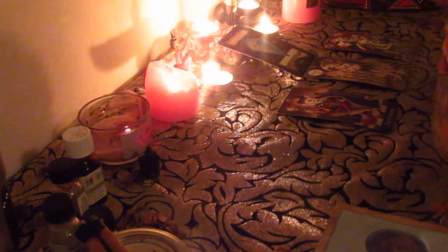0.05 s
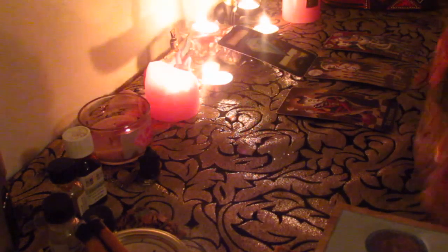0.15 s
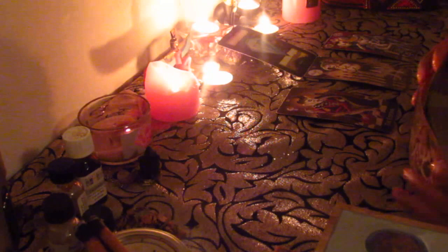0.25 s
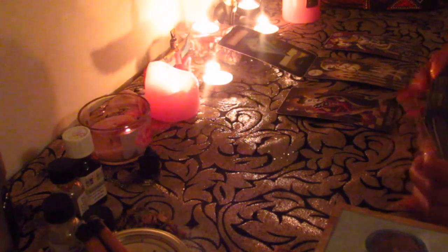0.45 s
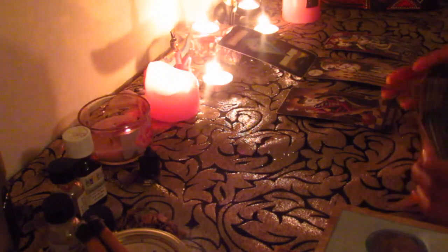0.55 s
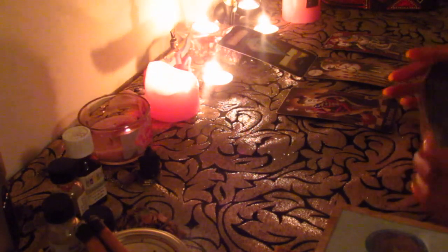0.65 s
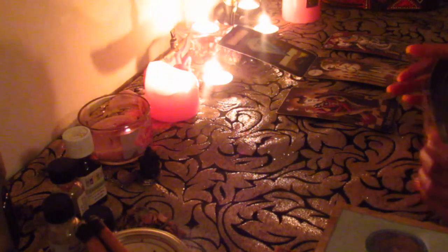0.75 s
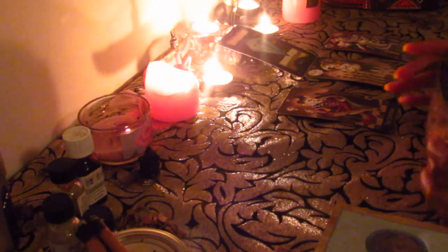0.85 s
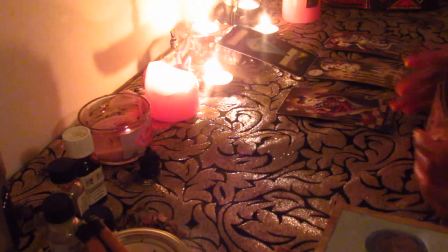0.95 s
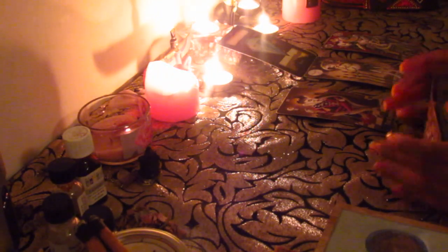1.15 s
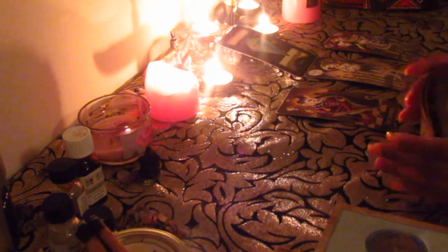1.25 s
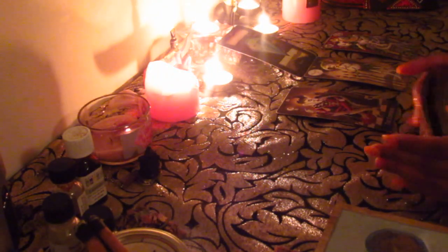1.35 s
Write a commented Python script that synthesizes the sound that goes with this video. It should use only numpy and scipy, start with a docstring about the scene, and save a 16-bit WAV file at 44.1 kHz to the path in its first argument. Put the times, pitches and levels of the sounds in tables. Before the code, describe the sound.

A deck of cards is knocked once on a cloth-covered wooden table with a dull, clacking thump. Faint card sliding, hand rubbing and a few soft pats follow, heard slightly left in a small, quiet room.

```python
"""A small, quiet room: a faint tone fades over the low room tone while cards slide through the hands.
At 0.2 s the deck is knocked once on a cloth-covered wooden table. Hand and deck land in a quick cluster
of contacts: the top thuds, the cards clack, the deck's edge cracks, table and room ring on.
Then cards slide and a hand rubs the deck; from 0.6 s come a few soft pats and ticks of card edges.
Near 1.4 s a small hard thing is touched and clinks faintly."""
import sys
import numpy as np
from scipy import signal
from scipy.fft import rfft, irfft
from scipy.io import wavfile
from scipy.ndimage import uniform_filter1d

SR = 44100
rng = np.random.default_rng(int(sys.argv[2]) if len(sys.argv) > 2 else 0)


def master(y):
    """Save y as 16-bit WAV."""
    cut = np.clip(np.atleast_2d(y).T, -1, 1)
    pcm = np.round(cut * 32767)  # scale
    wavfile.write(sys.argv[1], SR, pcm.astype(np.int16))


N = 61739
TIME = np.arange(N) / SR
HZ = np.maximum(np.arange(N // 2 + 1) * SR / N, 1)
CLACK_ATTACK_S = 0.00091


def knock():
    """Hand and deck land in a cluster of contacts; the hand's weight rocks the whole table."""
    # (time [s], thud [dB], clack [dB], clack cutoff [Hz])
    contacts = [(0.190, -31, -34.5, 1760), (0.2, -23, -26, 1440), (0.2085, -32, -15, 2200),
                (0.2187, -4.5, -20.5, 1790), (0.228, -28, -12.5, 4450), (0.2325, -18.5, -11, 3050),
                (0.2385, -11, -15.5, 2520), (0.2465, -20, -18.5, 2150)]
    # table top: (frequency [Hz], level [dB], t60 [s])
    top_modes = [(251.5, -16, 0.11), (300.5, -1, 0.028), (351, -13.5, 0.081), (489.4, -10, 0.078),
                 (546.7, -23, 0.18)]
    # whole table: (frequency [Hz], level [dB], t60 [s])
    rocking_modes = [(126.8, -26.5, 0.14), (170.4, -31.5, 0.2)]
    hits = sum(contact(top_modes, *row) for row in contacts)
    rocking = high_pass(struck(rocking_modes, start_s=0.23), hz=73)
    return hits + edge_crack() + rocking


def contact(modes, start_s, thud_db, clack_db, cutoff_hz):
    """One contact: the body thuds in its modes, the cards clack as a noise burst."""
    # clack spectrum: (frequency [Hz], density [dB])
    colour = [(100, 4), (300, 3), (520, 7), (670, 3), (800, 8.5), (1300, 1.5), (2400, 2.5), (3100, -2),
              (4200, -7), (5200, -17.5), (15000, -7)]
    t = np.maximum(TIME - start_s, 0)
    clack = evened(noise(colour)) * grainy(depth_db=2.5, rate_hz=304)  # loose cards rattle
    clack = clack * rising(t, CLACK_ATTACK_S) * dying(t, t60_s=0.081)
    clack = from_db(clack_db) * low_pass(clack, cutoff_hz, order=4)
    thud = struck(modes, start_s) * rising(t, tau_s=0.00094)
    thud = from_db(thud_db) * low_pass(thud, hz=765)  # softened by the cloth
    return high_pass(clack - thud, hz=187, order=3)  # the contacts carry little deep bass


def edge_crack(start_s=0.2298):
    """The deck's edge meets the table with a short crack."""
    # crack spectrum: (frequency [Hz], density [dB])
    colour = [(800, -23), (2000, -9), (3200, 4), (4200, -0.5), (5200, -24), (15000, -39)]
    t = np.maximum(TIME - start_s, 0)
    return from_db(-17) * evened(noise(colour)) * rising(t, CLACK_ATTACK_S) * dying(t, t60_s=0.015)


def table_rings():
    """The hardest contact sets the table and the things on it ringing thinly."""
    # lasting rings: (frequency [Hz], level [dB], t60 [s])
    modes = [(231.2, -31.5, .55), (546.6, -39.5, 0.62), (799, -37, 0.34), (906, -30, 0.22),
             (1033, -24, 0.19), (1190, -28.5, 0.26), (1490, -38.5, .35), (1658, -28, 0.15),
             (1843, -27.5, 0.23), (1881, -32.5, 0.41), (1955, -33, 0.24), (2406, -24, 0.12),
             (3426, -33, 0.1), (4110, -34.5, 0.11)]
    return low_pass(struck(modes, start_s=0.231), hz=4420, order=4)


def pats():
    """Soft pats on the cards: weak, dull contacts."""
    # (time [s], thud [dB], clack [dB], clack cutoff [Hz])
    contacts = [(0.614, -45, -29, 1130), (0.6215, -26.5, -40, 650), (0.9312, -31, -42.5, 2000),
                (1.288, -34, -51, 1100)]
    # ring of a pat: (frequency [Hz], level [dB], t60 [s])
    modes = [(139.5, -1.5, 0.19), (312.1, -8, 0.23), (339, -1.5, 0.061), (480, -4.5, 0.045)]
    return sum(contact(modes, *row) for row in contacts)


def card_slides():
    """Sliding cards: bright friction."""
    # (peak time [s], level [dB], rise [s], fall [s])
    strokes = [(0.049, -46.5, 0.04, 0.028), (0.225, -50.5, 0.022, 0.046), (0.405, -49, 0.056, 0.027),
               (0.466, -41, 0.032, 0.014), (0.618, -52.5, 0.036, 0.068), (0.73, -56, 0.017, 0.021),
               (0.902, -53.5, 0.023, 0.027), (1.005, -51, 0.04, 0.057), (1.07, -53, 0.061, 0.033),
               (1.301, -49, 0.024, 0.023), (1.39, -59.5, 0.0059, .03)]
    # slide spectrum: (frequency [Hz], density [dB])
    colour = [(150, -12), (400, 1), (670, 3), (1100, 4), (2500, -0.5), (4500, -3), (8000, -2.5),
              (12000, -4), (15000, -12)]
    return friction(strokes, colour)


def hand_rubs():
    """A hand rubs over the deck: duller friction."""
    # (peak time [s], level [dB], rise [s], fall [s])
    strokes = [(0.055, -61.5, 0.063, 0.045), (0.468, -39, 0.048, 0.029), (0.905, -51.5, 0.0079, 0.013),
               (1.388, -51.5, .006, 0.0075)]
    # rub spectrum: (frequency [Hz], density [dB])
    colour = [(100, -3), (400, -2), (670, -12), (1100, 4), (1800, -3.5), (2900, -2), (4500, -17.5),
              (15000, -52)]
    return friction(strokes, colour)


def friction(strokes, colour):
    """Grainy hiss that swells and dies with each stroke."""
    power = np.zeros(N)
    for peak_s, db, rise_s, fall_s in strokes:
        width_s = np.where(TIME < peak_s, rise_s, fall_s)
        power += from_db(db) ** 2 * np.exp(-2 * ((TIME - peak_s) / width_s) ** 2)
    return noise(colour) * np.sqrt(power) * grainy(depth_db=2, rate_hz=1230)


def edge_flicks():
    """Card edges slip free: each a tiny bright snap with a short tail."""
    # (time [s], level [dB])
    ticks = [(0.616, -50.5), (0.8363, -44.5), (0.906, -56.5), (1.295, -49)]
    # tick spectrum: (frequency [Hz], density [dB])
    colour = [(500, 0.5), (2500, -7), (4300, -7), (5400, -6.5), (7500, -1.5), (10000, -16), (15000, -8.5)]
    envelope = np.zeros(N)
    for start_s, db in ticks:
        t = TIME - start_s
        snap = from_db(5) * dying(t, t60_s=0.0048)
        envelope += from_db(db) * (t > 0) * (snap + dying(t, t60_s=0.069))
    return noise(colour) * envelope


def clink():
    """A small hard thing is touched and rings faintly."""
    # (frequency [Hz], level [dB], t60 [s])
    modes = [(2660, -56, .07), (3020, -52, .09)]
    return struck(modes, start_s=1.3835)


def room(direct, delay_s=0.0029):
    """Diffuse reflections build up quickly and die band by band."""
    # reverb spectrum: (frequency [Hz], level [dB])
    colour = [(100, -8.5), (220, 2), (400, -8.5), (580, -1), (800, -7), (1100, 2), (1800, 3.5),
              (2800, -2.5), (4500, -2), (15000, 4)]
    # reverb time: (frequency [Hz], t60 [s])
    decay = [(100, 0.34), (500, 0.56), (1500, 0.72), (3000, 0.66), (6000, 0.57), (15000, 0.26)]
    # (frequency [Hz], left-right correlation [1])
    correlation = [(100, 0.91), (400, 0.89), (1000, 0.83), (2000, 0.95), (4000, .95), (8000, 0.76),
                   (14000, 0.22)]
    white = noise([(20, 0), (20000, 0)], correlation)
    spectrum = rfft(white) * from_db(at_hz(colour, HZ))
    t = np.maximum(TIME - delay_s, 0)
    edges_hz = np.geomspace(40, 20000, 10)
    tail = np.zeros((2, N))
    for lo, hi in zip(edges_hz, edges_hz[1:]):
        band = irfft(spectrum * (HZ >= lo) * (HZ < hi), N)
        tail += band * dying(t, at_hz(decay, np.sqrt(lo * hi)))
    nominal_energy = np.sum(dying(TIME, t60_s=0.56) ** 2)
    tail *= rising(t, tau_s=0.0027) / np.sqrt(nominal_energy)
    mono = direct.mean(axis=0)[None]
    return from_db(-5) * signal.fftconvolve(mono, tail, axes=1)[:, :N]


def background(tone_hz=391, fade_s=0.15):
    """Low room tone, and a faint tone that fades before the knock."""
    # room tone spectrum: (frequency [Hz], density [dB])
    colour = [(20, -10), (38, 0), (80, -5), (135, 4.5), (220, -1.5), (400, -5.5), (680, -14), (1100, -16),
              (3000, -27.5), (8000, -30), (15000, -34.5)]
    # (frequency [Hz], left-right correlation [1])
    correlation = [(40, 0.11), (140, 0.19), (400, 0.083), (1500, 0.56), (3500, 1), (6000, 0.51),
                   (14000, .15)]
    fade = np.sqrt(np.clip(1 - TIME / fade_s, 0, 1))
    tone = from_db(-48.5) * fade * np.sin(2 * np.pi * tone_hz * TIME)
    return from_db(-47.5) * noise(colour, correlation) + tone


def struck(modes, start_s):
    """Damped sines from start_s on."""
    t = np.maximum(TIME - start_s, 0)
    return sum(from_db(db) * np.sin(2 * np.pi * hz * t) * dying(t, t60_s) for hz, db, t60_s in modes)


def noise(colour, correlation=None):
    """Coloured stereo noise, rms 1."""
    # direct sound: (frequency [Hz], left-right correlation [1])
    direct_correlation = [(60, 0.41), (140, 1), (400, 0.9), (1000, 0.92), (2500, 1), (5000, 0.97),
                          (8000, 0.83), (14000, 0.28)]
    alike = np.clip(at_hz(correlation or direct_correlation, HZ), 0, .995)
    mid, side = rfft(rng.standard_normal((2, N))) * from_db(at_hz(colour, HZ))
    x = irfft(np.sqrt(1 + alike) * mid + np.sqrt(1 - alike) * side * [[1], [-1]], N)
    return x / x.std()


def grainy(depth_db, rate_hz):
    """Fast random gain, rms 1."""
    grain = low_pass(rng.standard_normal(N), rate_hz)
    gain = from_db(depth_db * grain / grain.std())
    return gain / np.sqrt(np.mean(gain ** 2))


def evened(x):
    """Hold the short-term rms steady."""
    return x / np.sqrt(uniform_filter1d(np.mean(x ** 2, axis=0), size=128) + 1e-12)


def rising(t, tau_s):
    """Exponential attack."""
    return 1 - np.exp(-t / tau_s)


def dying(t, t60_s):
    """Decay of 60 dB in t60_s."""
    return np.exp(-np.log(1000) * np.maximum(t, 0) / t60_s)


def low_pass(x, hz, order=2):
    """Causal low-pass."""
    return signal.sosfilt(signal.butter(order, hz, fs=SR, output="sos"), x + 1e-18)


def high_pass(x, hz, order=2):
    """Causal high-pass."""
    return signal.sosfilt(signal.butter(order, hz, "high", fs=SR, output="sos"), x + 1e-18)


def at_hz(points, hz):
    """Interpolate a table over log frequency."""
    knots_hz, values = np.transpose(points)
    return np.interp(np.log(hz), np.log(knots_hz), values)


def from_db(db):
    """Decibels to gain."""
    return 10 ** (np.asarray(db) / 20)


def scene():
    """Knock and card handling in the room, slightly left; the thin rings bypass the reverb."""
    direct = knock() + pats() + card_slides() + hand_rubs() + edge_flicks() + clink()
    pan = from_db([[0.39], [-0.39]])
    return (direct + table_rings() + room(direct) + background()) * pan


def record(dry):
    """Microphone with one narrow dip, then a steep treble cut."""
    dip_hz, dip_width_hz, dip_depth, cutoff_hz = 673, 129, 0.89, 15100
    notched = signal.lfilter(*signal.iirnotch(dip_hz, dip_hz / dip_width_hz, fs=SR), dry)
    coloured = dry + dip_depth * (notched - dry)
    return signal.sosfilt(signal.ellip(10, .1, 80, cutoff_hz, fs=SR, output="sos"), coloured)


dry = scene()
out = record(dry)
master(out)
```